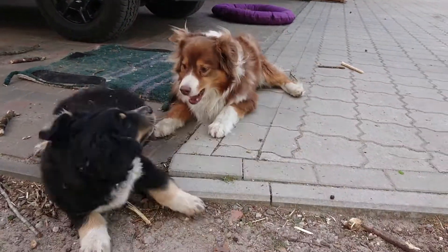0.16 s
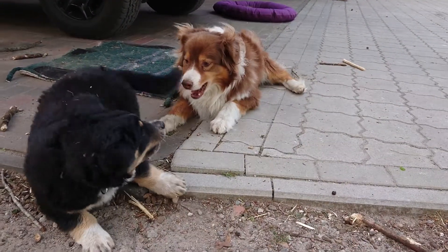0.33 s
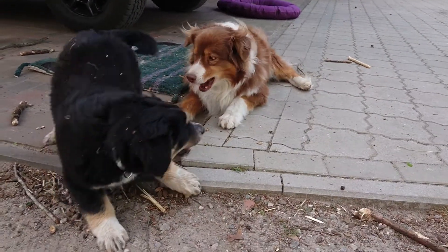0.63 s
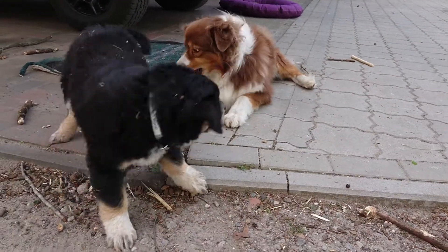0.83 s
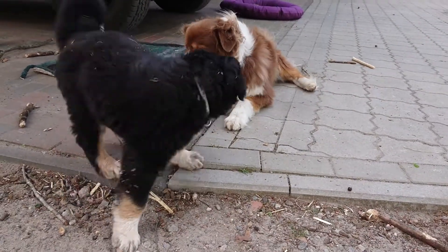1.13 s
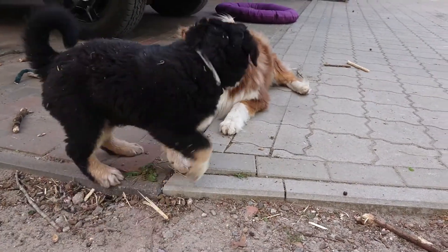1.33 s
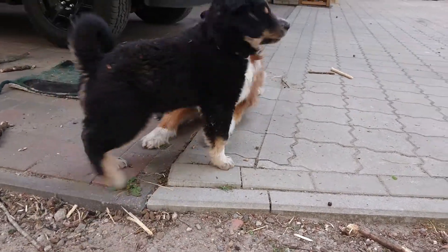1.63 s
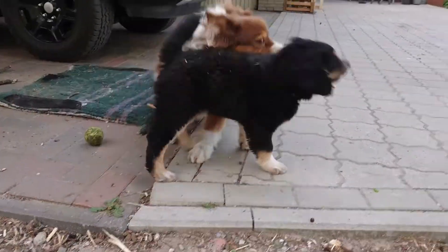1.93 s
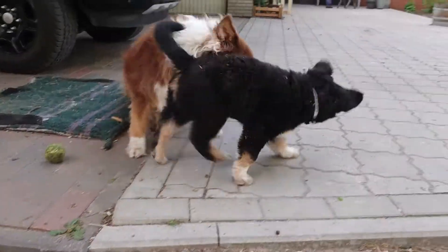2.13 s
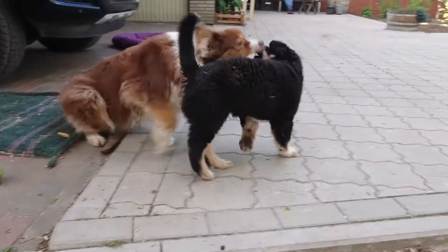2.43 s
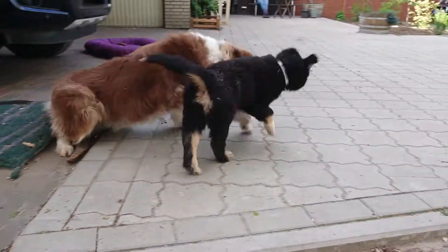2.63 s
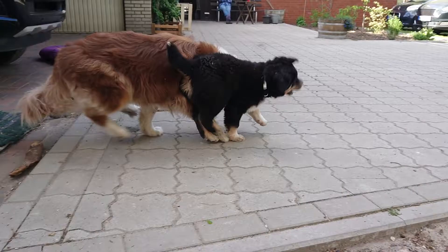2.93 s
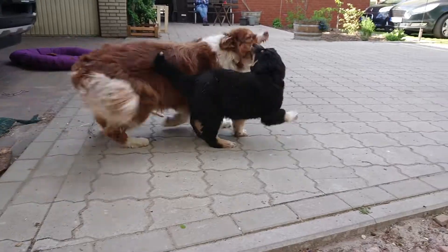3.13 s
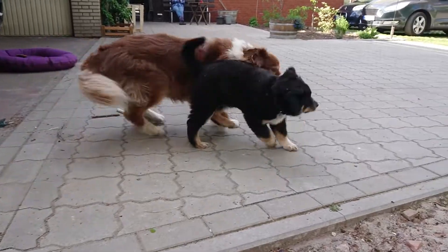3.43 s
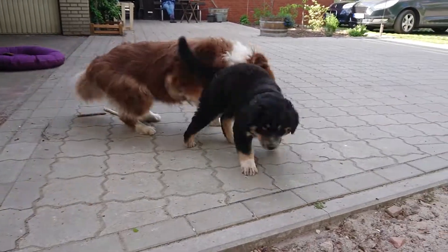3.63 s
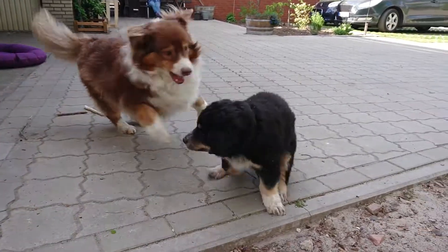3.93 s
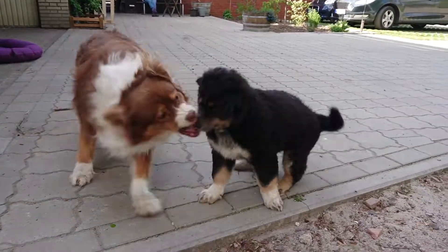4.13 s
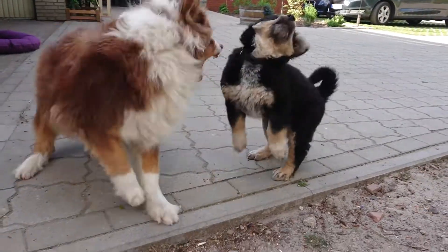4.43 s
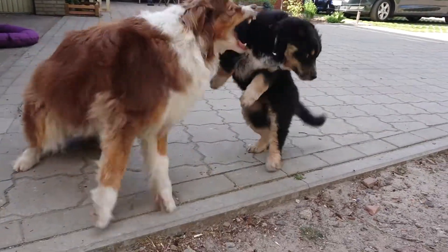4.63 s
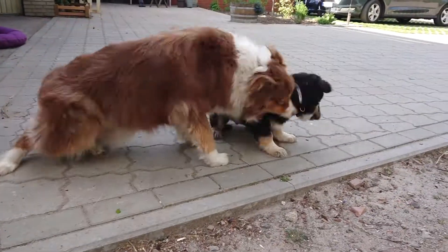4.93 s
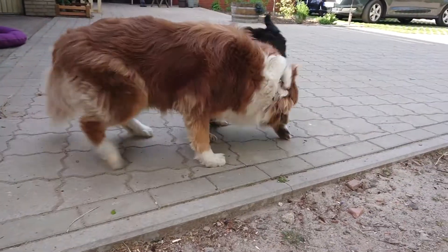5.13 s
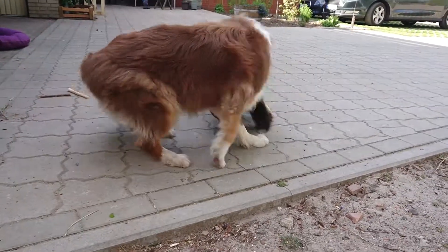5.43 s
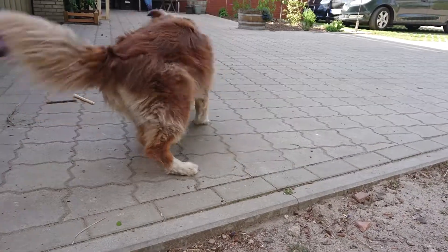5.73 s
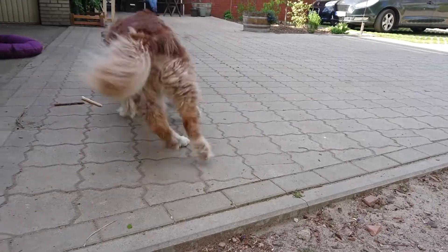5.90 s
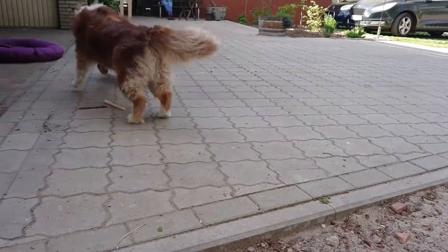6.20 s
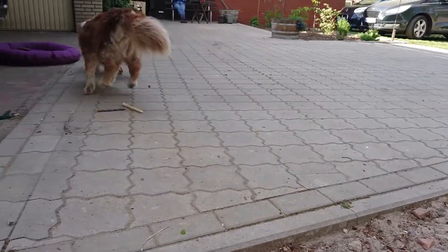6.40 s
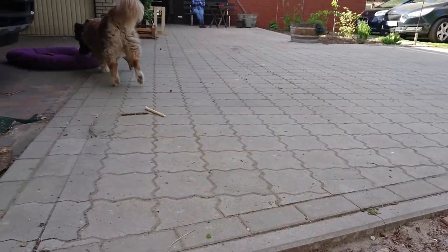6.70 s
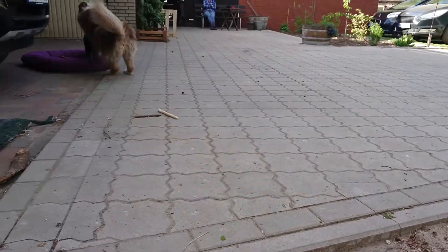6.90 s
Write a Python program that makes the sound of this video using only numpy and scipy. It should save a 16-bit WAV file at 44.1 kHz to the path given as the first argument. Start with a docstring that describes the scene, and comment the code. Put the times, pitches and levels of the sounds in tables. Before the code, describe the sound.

Close outdoor stereo pickup in a paved yard. Soft muzzle grumbles, rubbing coats, gritty scuffs and tiny puppy whimpers come first. The play then intensifies: brief snarls, a short bark, a run of rough growls with skidding claws and a faint collar clink, then two higher barks and a hoarse final growl. Walls return short echoes. Wind rumbles and thumps, mostly on the right.

```python
"""Muzzles grumble in fur and paws scuff grit, then small whimpers: a dog and a puppy wrestle on a paved yard.
Snarls, three arching barks and a last hoarse growl follow: fold pulses and breath through moving resonances.
Claws tick and skid as noise bursts, a collar clinks as decaying sines, and the voices echo off house and fence.
Band-filtered turbulence buffets two microphone ports, and single eddies thump the right one, over still air."""
import sys
import numpy as np
from scipy import signal
from scipy.fft import rfft, irfft, next_fast_len
from scipy.io import wavfile
from scipy.ndimage import uniform_filter1d

SR = 44100
rng = np.random.default_rng(int(sys.argv[2]) if len(sys.argv) > 2 else 0)


def waveform_to_disk(signal):
    """Save audio, clipped to [-1, 1], as 16-bit WAV at the path in sys.argv[1]."""
    frames = np.transpose(np.atleast_2d(signal))
    scaled = np.clip(frames, -1, 1) * 32767
    samples = np.round(scaled).astype(np.int16)
    wavfile.write(sys.argv[1], SR, samples)


N = 311238
TIME = np.arange(N) / SR
TOP_HZ = 16200  # top of the microphone's passband

# Levels are relative: trims, filters and echoes follow.
# Bark contours, one list a bark: [t/s, pitch/Hz, level/dB]
BARKS = [
    [(3.527, 269, -36), (3.545, 328.3, -23.5), (3.566, 368, -20.5), (3.587, 378.7, -19),
     (3.612, 359.2, -20.5), (3.633, 320.6, -22.5), (3.648, 279.3, -26.5), (3.685, 212.4, -46.5)],
    [(5.34, 251.4, -41.5), (5.358, 269.2, -26), (5.38, 302.8, -23.5), (5.403, 367.4, -17.5),
     (5.422, 413, -21.5), (5.442, 485.8, -22), (5.466, 488.4, -21.5), (5.495, 317.3, -28), (5.54, 245, -40)],
    [(6.05, 270.4, -31), (6.083, 346, -23.5), (6.106, 369.3, -15.5), (6.122, 424.4, -18),
     (6.14, 466.9, -21), (6.195, 467.7, -26.5), (6.24, 378, -37.5)],
]
# Snarl contours, one list a snarl: [t/s, pitch/Hz, level/dB]
SNARLS = [
    [(3.175, 129.4, -47.5), (3.21, 144, -34.5), (3.235, 135, -49.5)],
    [(4.11, 93.95, -52.5), (4.15, 130.8, -34.5), (4.195, 186.7, -31), (4.215, 208.4, -22),
     (4.26, 195.4, -26.5), (4.275, 184.3, -39), (4.335, 175.4, -34.5)],
    [(4.335, 169, -44), (4.37, 191.3, -33.5), (4.39, 211.8, -25), (4.423, 264.9, -25), (4.431, 283, -16.5),
     (4.472, 279.9, -21), (4.488, 259.7, -15), (4.503, 225, -29.5), (4.53, 196.3, -35), (4.59, 171, -47)],
    [(4.585, 177.4, -38), (4.645, 177, -36), (4.68, 170.5, -29), (4.71, 166.9, -29.5), (4.73, 128.5, -45),
     (4.80, 86.6, -53)],
    [(5.915, 172, -34.5), (5.932, 185, -32.5), (5.96, 180.3, -38.5), (6.06, 205.4, -37.5)],
    [(6.665, 163.2, -39.5), (6.72, 179, -34.5), (6.78, 208.2, -31.5), (6.87, 195.7, -37), (7.04, 159, -44)],
]
# Call character, one row a call: [roughness at top pitch/0-1, jaw opening/dB, right port delay/ms, chest hum/dB]
BARK_STYLES = [(.12, 4, .033, -10.5), (.15, -2.5, .093, -7), (.27, 5, 0.18, -26.5)]
SNARL_STYLES = [(0.7, 0, .06, -18.5), (.5, 15.5, .16, -8), (.33, 17, .013, -14.5), (.45, 7.5, .006, -0.5),
                (0.8, -0.5, .1, -24.5), (0.94, -0.5, 0.27, -16.5)]
# Barking throat resonances at top pitch: [f/Hz, width/Hz, gain/dB]
BARK_THROAT = [(491, 170, 9), (784, 278, 12)]
# Snarling chest resonance at top pitch: [f/Hz, width/Hz, gain/dB]
SNARL_CHEST = [(250, 440, 3)]
# Resonances of the open jaws at top pitch, one list a bark: [f/Hz, gain/dB]
BARK_JAWS = [
    [(1250, -2.5), (1850, -1.5), (2280, -1.5), (2600, 0.5), (3050, 1)],
    [(1180, -1.5), (1450, 2.5), (1950, 4.5), (2480, 3)],
    [(1330, 4), (1880, -0.5), (2300, 0.5), (2620, 3)],
]
# Resonances behind the bared teeth at top pitch, one list a snarl: [f/Hz, gain/dB]
SNARL_JAWS = [
    [(850, 5.5), (1900, -3.5)],
    [(410, -1), (840, 10.5), (1300, -6), (1750, -2.5), (2130, -0.5), (3900, -8)],
    [(860, 15), (1080, 5), (1400, 0), (1700, -17), (2300, -9), (3400, -8)],
    [(850, 12), (1720, -1), (2150, -2), (3350, -6)],
    [(870, 1), (1320, -6)],
    [(480, 5.5), (830, 7.5), (1180, -1.5), (2150, -4)],
]
# Puppy whimpers: [t/s, length/s, start f/Hz, end f/Hz, level/dB]
WHIMPERS = [(0.323, 0.037, 653, 504, -50), (0.545, 0.033, 635, 480, -46), (0.759, 0.05, 532, 428, -52),
            (1.04, 0.18, 505, 542, -57.5)]
# Muzzles grumbling in fur: [t/s, length/s, level/dB]
GRUMBLES = [(.02, 0.066, -47.5), (1.08, 0.074, -59), (1.91, 0.041, -50.5), (2.295, 0.012, -42.5),
            (2.37, 0.075, -50.5), (2.49, 0.015, -50.5), (3.02, 0.071, -48), (3.314, .012, -43),
            (3.35, 0.089, -45.5), (3.474, .015, -42), (3.505, 0.027, -43.5), (4.84, 0.016, -44)]
GRUMBLE_RISE_S, GRUMBLE_FALL_DB_PER_S = 0.008, 224
# Colour of grumbles and rubbing coats: [f/Hz, gain/dB]
RUB_COLOUR = [(150, -7), (500, 4.5), (1250, 5.5), (2250, 4), (3000, -9.5), (6000, -10.5)]
# Overall movement of the dogs, driving grit and coats: [t/s, level/dB]
BUSTLE = [(0, -64.5), (1.4, -67.5), (1.6, -57.5), (2.05, -64), (2.3, -55.5), (4.0, -60), (4.5, -48.5),
          (5.0, -57), (6.4, -62.5), (7.05, -53.5)]
# Paws dragging over grit, and breathy hiss under the first and third barks (3.54, 6.1): [t/s, length/s, level/dB]
SCUFFS_AND_HISS = [(.02, .15, -59.5), (1.66, 0.057, -50), (2.16, .038, -55), (3.54, 0.16, -51.5),
                   (3.75, 0.025, -47.5), (4.17, 0.066, -44), (4.36, .13, -40.5), (4.65, 0.0193, -42),
                   (5.14, 0.03, -46), (5.59, 0.023, -49), (6.1, 0.16, -50)]
SCUFF_RISE_S, SCUFF_FALL_DB_PER_S = 0.0058, 159
# Colour of the grit and bark hiss: [f/Hz, gain/dB]
GRIT_COLOUR = [(600, -49.5), (2000, 5.5), (6200, 3.5), (10000, -2.5), (12500, 4), (16000, -6)]
# Claws on paving: [t/s, level/dB, t60/s, treble/dB]
CLAWS = [(1.921, -35.5, 0.0097, 1), (2.164, -54, 0.19, 9), (3.02, -43.5, 0.14, -3),
         (3.0588, -42.5, 0.022, 2), (3.507, -48, 0.13, 2), (3.757, -43.5, 0.096, 0.5),
         (3.856, -54, 0.12, 7), (4.09, -41, 0.097, 3), (4.187, -40, 0.18, -1.5), (4.624, -38, 0.09, -9),
         (4.773, -35, 0.027, -4), (4.838, -41.5, 0.052, -8), (4.9015, -41, 0.045, -6),
         (5.7572, -43, 0.027, 2), (6.528, -48, 0.035, 6)]
# Collar fitting's modes: [f/Hz, level/dB, t60/s]
TAG_MODES = [(9940, -11, 0.16), (14410, -1, .08)]
# Collar clinks: [t/s, level/dB]
TAG_CLINKS = [(3.24, -37.5), (4.187, -30.5), (5.944, -38.5)]
# House and fence echoes: [delay/s, level/dB]
ECHOES = [(.021, -17.5), (.058, -17.5), (.15, -29)]
# Colour of the yard's ringing tail: [f/Hz, gain/dB]
YARD_TAIL = [(100, -27), (750, 7), (1080, 6), (1420, 10.5), (1900, 5.5), (3300, 4), (14000, 30)]
# Single eddies at the right port: [t/s, peak/dB, f/Hz, envelope width/swings]
THUMPS = [(2.811, -17.5, 129, 0.87), (2.837, -10, 250, 0.77), (2.860, -14, 200, 0.49),
          (2.896, -17.5, 162, 0.46), (2.922, -22.5, 130, 1.1), (2.942, -21, 231, 0.96),
          (3.259, -14.5, 265, 1.7), (3.28, -15, 123.6, 0.4), (5.303, -15, 196, 2.1),
          (5.484, -12, 277, 0.55), (5.776, -17, 170, 1.1), (5.932, -6, 277, 0.95),
          (5.991, -13.5, 153.6, 0.94), (6.444, -21, 134, 0.38), (6.484, -15.5, 130, 1),
          (6.551, -18.5, 168, 0.44), (6.594, -20, 204, 0.57), (6.652, -19, 178, 0.35),
          (7.024, -16.5, 142, .7)]
# Gusts: [t/s, length/s, left port/dB, right port/dB]
GUSTS = [(0.924, 0.054, -49, -43), (1.027, .15, -56, -37.5), (1.322, 0.071, -51, -34),
         (1.625, 0.064, -44.5, -37), (1.973, 0.056, -35.5, -40.5), (2.159, .39, -32.5, -41),
         (2.793, 0.13, -33.5, -27.5), (2.987, 0.15, -40.5, -33.5), (3.293, 0.33, -41.5, -40),
         (3.646, .12, -45, -27.5), (5.227, .13, -44.5, -28), (5.466, 0.18, -51, -30),
         (5.753, 0.29, -57.5, -28.5), (6.084, 0.13, -37.5, -22.5), (6.405, 0.37, -43.5, -29.5)]
GUST_RISE_S, GUST_FALL_DB_PER_S = 0.0087, 381.5
# Light breeze between gusts: [t/s, left port/dB, right port/dB]
BREEZE = [(0, -73, -103), (0.8, -58, -52), (2.2, -45.5, -50.5), (3.3, -33.5, -32.5), (4.0, -49, -47),
          (4.6, -47, -44), (5.05, -45, -56), (5.7, -46.5, -30), (7.05, -33.5, -61.5)]
# Wind colour: [f/Hz, level/dB]
WIND_BANDS = [(55, -5.5), (85, -1), (130, -1), (200, -5.5), (310, -13.5), (480, -28.5), (750, -55.5)]
# Colour of still outdoor air: [f/Hz, gain/dB]
AIR = [(25, -24), (71, 3), (450, -17), (6050, -35.5), (7870, -50.5), (13000, -25.5), (16000, -49)]
AIR_DB = -60.5
# Microphone response: [f/Hz, gain/dB]
MIC = [(24, -26), (48, 8.5), (6900, -5), (7600, -19.5), (9000, -26.5), (9900, -8.5)]


def undb(db):
    """Decibels to gain."""
    return 10 ** (np.asarray(db) / 20)


def curves(rows):
    """Each column of a table, joined by straight lines in time."""
    s, *columns = np.transpose(rows)
    return [np.interp(TIME, np.sort(s), c) for c in columns]


def unit(x):
    """Scale to rms 1."""
    return x / np.sqrt(np.mean(x ** 2))


def steady(x, window_s):
    """Scale to a running rms of 1."""
    power = np.abs(uniform_filter1d(x ** 2, int(window_s * SR)))
    return x / np.sqrt(power + 1e-12)


def colour(x, points):
    """Filter by a spectrum of (f/Hz, gain/dB) points."""
    size = next_fast_len(x.shape[-1] + 4096)
    hz, db = np.transpose(points)
    bins_hz = np.fft.rfftfreq(size, 1 / SR)
    gain = undb(np.interp(np.log(bins_hz + 1), np.log(hz), db))
    return irfft(rfft(x, size) * gain, size)[..., :x.shape[-1]]


def band(x, hz, width_hz):
    """A resonance applied twice, for steep skirts."""
    b, a = signal.iirpeak(hz, hz / width_hz, fs=SR)
    return signal.lfilter(b, a, signal.lfilter(b, a, x))


def resonate(x, modes):
    """Parallel resonances: (f/Hz, width/Hz, gain/dB)."""
    return sum(undb(db) * band(x, hz, width_hz) for hz, width_hz, db in modes)


def slide(x, modes, scale):
    """Resonances whose frequencies all move by `scale`: they ring on a clock that runs faster or slower."""
    clock = np.cumsum(scale)
    ticks = np.arange(int(clock[-1]))
    warped = np.interp(ticks, clock, x)
    return np.interp(clock, ticks, resonate(warped, modes))


def walk(t, rate_hz):
    """Random wander of spread near 1, with `rate_hz` new targets a second."""
    place = (t - t[0]) * rate_hz
    return 1.464 * np.interp(place, np.arange(len(t)), rng.standard_normal(len(t)))


def add(out, start_s, x):
    """Mix x in at a time."""
    i = max(int(start_s * SR), 0)
    out[..., i:i + x.shape[-1]] += x[..., :N - i]


def spread(pair, side):
    """Two unrelated signals as middle and side."""
    return (pair[0] + side * pair[1] * np.array([[1], [-1]])) / np.hypot(1, side)


def swells(rows, rise_s, fall_db_per_s):
    """Gain of overlapping events: each rises, holds to the end of its length and dies away."""
    power = np.zeros(N)
    t = np.arange(SR) / SR
    for start_s, length_s, db in rows:
        rise = np.minimum(t / rise_s, 1)
        fall_db = fall_db_per_s * np.maximum(t - length_s, 0)
        add(power, start_s, (rise * undb(db - fall_db)) ** 2)
    return np.sqrt(power)


def calls(tables, styles, throat, jaws, width_hz, hiss_db, jitter, shimmer_db, rasp, flutter_hz, slack,
          shut_db, open_s, gape, lift, sink):
    """Vocal fold pulses and pulsed breath ring the throat; opening the jaws lets the upper resonances out."""
    out = np.zeros((2, N))
    for rows, (top_rough, open_db, delay_ms, chest_db), formants in zip(tables, styles, jaws):
        s, *columns = np.transpose(rows)
        t = np.arange(s[0], s[-1], 1 / SR)
        hz, db = (np.interp(t, np.sort(s), c) for c in columns)
        relative_pitch = hz / hz.max()
        # roughness changes by `slack` as the pitch sinks below its top
        rough = np.clip(top_rough + slack * (1 - relative_pitch), 0, 1)
        # jaws start shut, open over `open_s`, and gape wider the louder the call
        shut = np.maximum(1 - (t - t[0]) / open_s, 0)
        mouth_db = open_db + shut_db * shut + gape * (db - db.max())

        phase = 2 * np.pi * np.cumsum(hz * (1 + jitter * rough * walk(t, flutter_hz))) / SR
        harmonics = range(1, int(TOP_HZ / 2 / hz.max()))
        pulses = unit(sum(np.cos(k * phase) for k in harmonics))
        # loose folds: every other pulse is weaker, and the strength flutters
        flutter = undb(shimmer_db * rough * np.tanh(walk(t, flutter_hz)))
        pulses *= (1 + rough * np.cos(phase / 2)) * flutter
        # a wholly hoarse voice loses its tone and leaves the rasp
        pulses *= 1 - rough ** 4
        puffs = unit(rng.standard_normal(len(t)) * (2 + np.cos(phase)))
        breath = rasp * rough * flutter * puffs

        # resonances bend with pitch: by `lift` up to its top, by `sink` after
        bend = relative_pitch ** np.where(t > t[hz.argmax()], sink, lift)
        # turbulence arises at the teeth, so the deep throat gets less of it
        deep = slide(pulses + breath / 2, throat, bend)
        # the hummed fundamental remains as the jaws shut
        chest = undb(chest_db) * np.cos(phase) * flutter
        jaw_modes = [(f, width_hz + f / 20, gain_db) for f, gain_db in formants]
        bright = slide(pulses + breath, jaw_modes, bend)
        # the mouth passes little above its highest resonance
        edge_hz = min(0.94 * formants[-1][0], SR / 4)
        bright = signal.sosfilt(signal.butter(6, edge_hz, fs=SR, output="sos"), bright)
        hiss = undb(hiss_db) * band(breath + pulses / 2, 3200, 3400)

        voice = chest + deep + undb(mouth_db) * bright + hiss
        voice = steady(voice, 0.013) * undb(db) * signal.windows.tukey(len(t), 0.06)
        add(out[0], t[0], voice)
        add(out[1], t[0] + delay_ms / 1000, voice)
    return out


def whimpers(overtone_db, waver):
    """Short squeaks, a fundamental and three overtones, slide ever faster in pitch."""
    out = np.zeros(N)
    for start_s, length_s, first_hz, last_hz, db in WHIMPERS:
        u = np.linspace(0, 1, int(length_s * SR))
        glide_hz = first_hz + (last_hz - first_hz) * u * (1 + u) / 2
        hz = glide_hz * (1 + waver * walk(u * length_s, 392))
        phase = 2 * np.pi * np.cumsum(hz) / SR
        overtones = sum(np.sin(k * phase) / np.sqrt(k) for k in range(2, 5))
        tone = np.sin(phase) + undb(overtone_db) * overtones
        add(out, start_s, tone * np.sin(np.pi * u) * undb(db))
    return out


def mouthing(trim_db, fur_db, flicker_db, flicker_hz, rattle_db):
    """Breathy grumbles through fur, and coats rubbing as the dogs move: each resonance comes and goes."""
    bands = np.zeros((2, N))
    for hz in np.geomspace(200, 6400, 18):
        noise = band(rng.standard_normal((2, N)), hz, hz / 4)
        bands += noise * undb(flicker_db * np.tanh(walk(TIME, flicker_hz)))
    sound = steady(colour(bands, RUB_COLOUR), 0.092)
    grumbling = swells(GRUMBLES, GRUMBLE_RISE_S, GRUMBLE_FALL_DB_PER_S)
    rubbing = undb(curves(BUSTLE)[0] + fur_db)
    effort = np.hypot(grumbling, rubbing)
    return spread(sound, 0.77) * effort * undb(trim_db + rattle_db * walk(TIME, 110))


def grit_and_hiss(grit_db, grain_db):
    """Noise of widely uneven strength: sand grains crunching under the paws, and breathy hiss under two barks."""
    strength_db = grain_db * np.minimum(rng.exponential(size=N), 8)
    grains = rng.standard_normal((2, N)) * undb(strength_db)
    bursts = swells(SCUFFS_AND_HISS, SCUFF_RISE_S, SCUFF_FALL_DB_PER_S)
    strength = np.hypot(undb(curves(BUSTLE)[0]), bursts)
    noise = unit(colour(grains, GRIT_COLOUR)) * strength
    return spread(noise * undb(grit_db + 2.0 * walk(TIME, 160)), 1.0)


def claws(body_db):
    """Hard claws on stone: a burst of bright noise, very short for a tick and longer for a skid."""
    out = np.zeros((2, N))
    t = np.arange(SR // 10) / SR
    for start_s, db, t60_s, treble_db in CLAWS:
        contact = rng.standard_normal((2, len(t))) * undb(db + body_db - 60 * t / t60_s)
        treble = undb(treble_db) * band(contact, 12000, 8600)
        add(out, start_s, band(contact, 6260, 6400) + treble)
    return spread(out, 0.88)


def collar():
    """A small metal fitting on the puppy's collar clinks: two decaying modes of random phase."""
    out = np.zeros((2, N))
    t = np.arange(SR // 4) / SR
    for start_s, db in TAG_CLINKS:
        for hz, mode_db, t60_s in TAG_MODES:
            phase = 2 * np.pi * (hz * t + rng.random((2, 1)))
            add(out, start_s, np.sin(phase) * undb(db + mode_db - 60 * t / t60_s))
    return out


def yard(x, tail_db, t60_s, early_db, early_t60_s):
    """Direct sound, quick scatter off paving and car, wall echoes and a ringing tail."""
    t = np.arange(SR) / SR
    scatter = unit(rng.standard_normal((2, SR)) * undb(-60 * t / early_t60_s) * (t > 0.003))
    tail = unit(rng.standard_normal((2, SR)) * undb(-60 * t / t60_s) * np.minimum(t / 0.0066, 1))
    early = undb(early_db) * scatter / np.sqrt(SR)
    for delay_s, db in ECHOES:
        for channel in range(2):
            early[channel, int(delay_s * SR) + rng.integers(40)] += undb(db)
    early = colour(early, [(100, -13.5), (1400, 4), (14000, 15.5)])
    late = colour(tail, YARD_TAIL) * undb(tail_db) / np.sqrt(SR)
    return x + signal.fftconvolve(x, early + late, axes=1)[:, :N]


def thumps(trim_db):
    """Eddies crossing the port: the pressure swings once or shudders a few times."""
    out = np.zeros(N)
    t = np.arange(-0.04, 0.04, 1 / SR)
    for start_s, db, hz, swings in THUMPS:
        u = 2 * np.pi * hz * t
        swing = -np.sin(u) / (1 + (u / (np.pi * swings)) ** 2) ** 2
        add(out, start_s + t[0], swing / swing.max() * undb(db + trim_db))
    return out


def wind(channel, trim_db, gust_db):
    """Turbulence on one port; stronger gusts hold smaller, higher eddies."""
    rows = [(start_s, length_s, ports[channel]) for start_s, length_s, *ports in GUSTS]
    gusts = swells(rows, GUST_RISE_S, GUST_FALL_DB_PER_S)
    db = 20 * np.log10(np.hypot(undb(curves(BREEZE)[channel]), gusts))
    force_db = db + 30 + gust_db * np.tanh(walk(TIME, 50))
    eddies = np.zeros(N)
    for hz, band_db in WIND_BANDS:
        noise = band(rng.standard_normal(N), hz, hz * 0.54)
        swirl = np.tanh(steady(noise, 0.049) / 2) * 2
        # higher bands respond more steeply to force
        eddies += swirl * undb(band_db + (hz / 110) ** 0.78 * force_db)
    return eddies * undb(trim_db)


def still_air():
    """Steady coloured noise, nearly central."""
    noise = unit(colour(rng.standard_normal((2, N)), AIR))
    return spread(noise, 0.16) * undb(AIR_DB)


def scene():
    """Dogs and paws in the yard, over still air and wind on the ports."""
    barks = calls(BARKS, BARK_STYLES, BARK_THROAT, BARK_JAWS, width_hz=244, hiss_db=-20.5,
                  jitter=0.06, shimmer_db=16, rasp=1.4, slack=0.3, flutter_hz=229.2,
                  shut_db=-18, open_s=0.074, gape=0.21, lift=0.14, sink=0.61)
    snarls = calls(SNARLS, SNARL_STYLES, SNARL_CHEST, SNARL_JAWS, width_hz=175, hiss_db=-27,
                   jitter=0.14, shimmer_db=8, rasp=2.1, slack=0.12, flutter_hz=200.05,
                   shut_db=-4.5, open_s=0.12, gape=1.0, lift=0.19, sink=0.38)
    squeaks = whimpers(overtone_db=-10.5, waver=0.023)
    dogs = yard(barks + squeaks, tail_db=-11, t60_s=0.45, early_db=-3.5, early_t60_s=0.032)
    # the snarls are lower and wake the yard less, so they are drier
    dogs += yard(snarls, tail_db=-17.5, t60_s=0.2, early_db=-10.0, early_t60_s=0.043)
    rubbing = mouthing(trim_db=0.5, fur_db=-1.5, flicker_db=8.0, flicker_hz=24.4, rattle_db=2.0)
    grit = grit_and_hiss(grit_db=1, grain_db=2.72)
    left, right = dogs + rubbing + grit + claws(body_db=9) + collar()
    left_wind = wind(channel=0, trim_db=-39.5, gust_db=6.5)
    right_wind = wind(channel=1, trim_db=-34.5, gust_db=5.5) + thumps(trim_db=-1)
    return np.array([left * undb(-0.5) + left_wind, right + right_wind]) + still_air()


def record(dry):
    """The microphone has a hollow near 9 kHz, rounds the loudest peaks and cuts the top."""
    ceiling = 0.85
    rounded = ceiling * np.tanh(colour(dry, MIC) / ceiling)
    return signal.sosfilt(signal.ellip(10, 0.2, 80, TOP_HZ, fs=SR, output="sos"), rounded)


dry = scene()
out = record(dry)
waveform_to_disk(out)
```